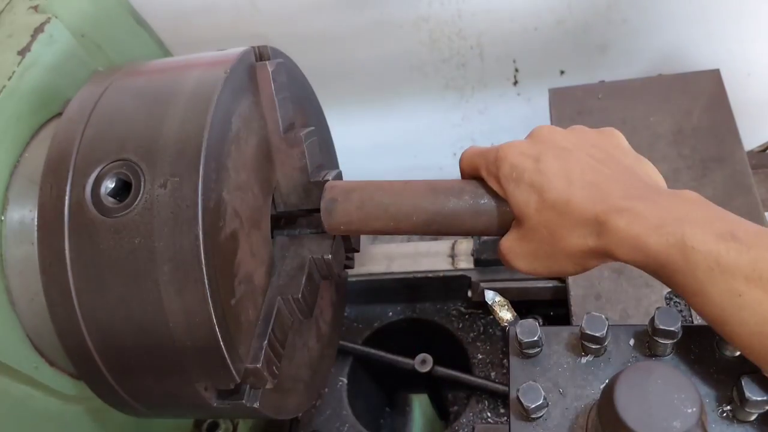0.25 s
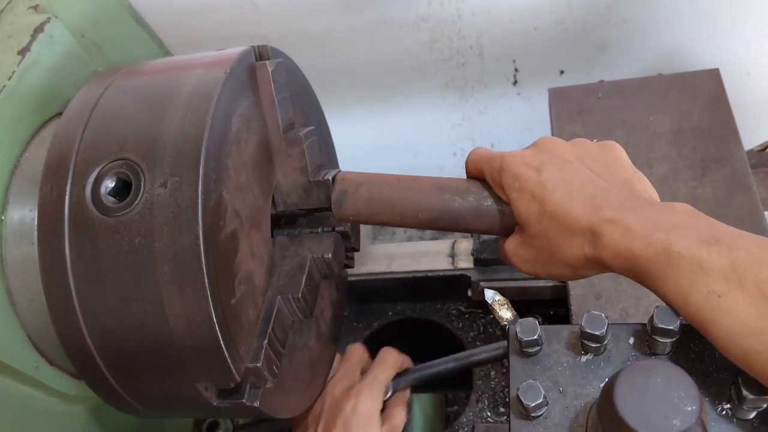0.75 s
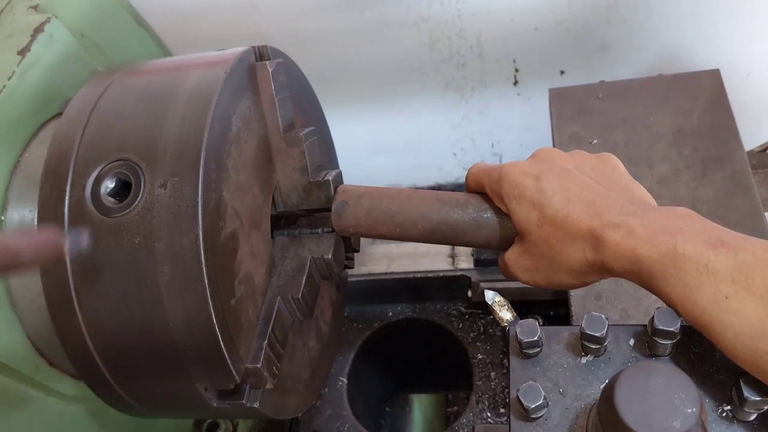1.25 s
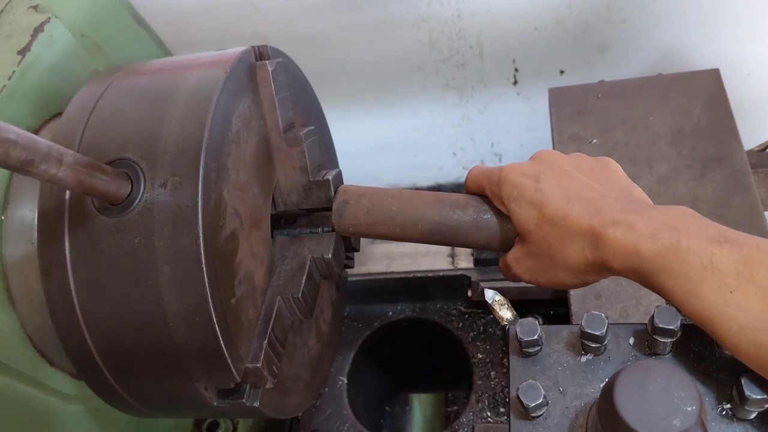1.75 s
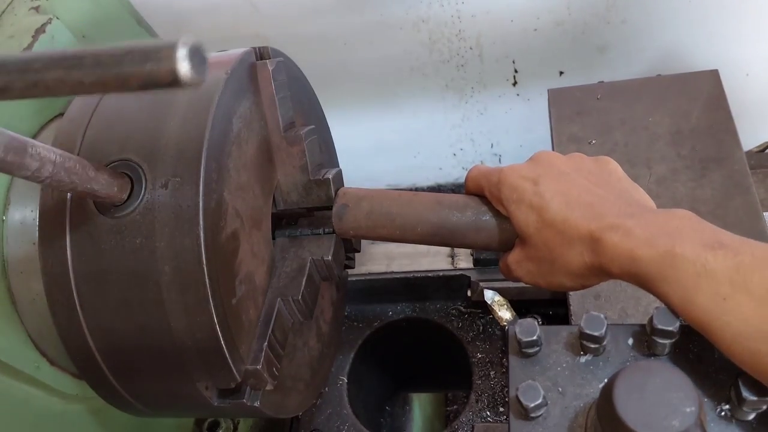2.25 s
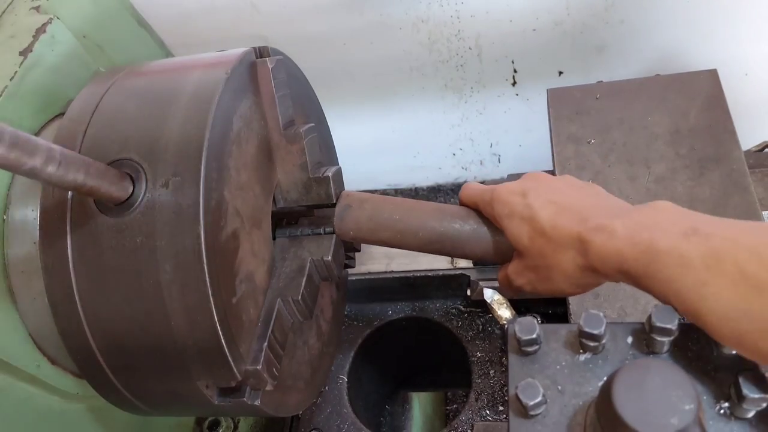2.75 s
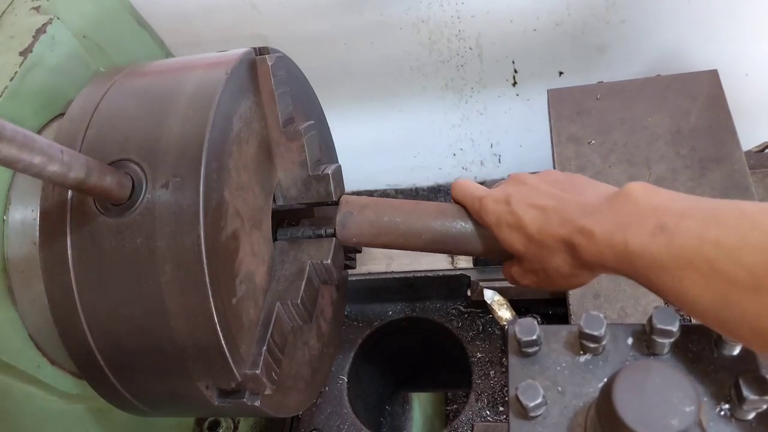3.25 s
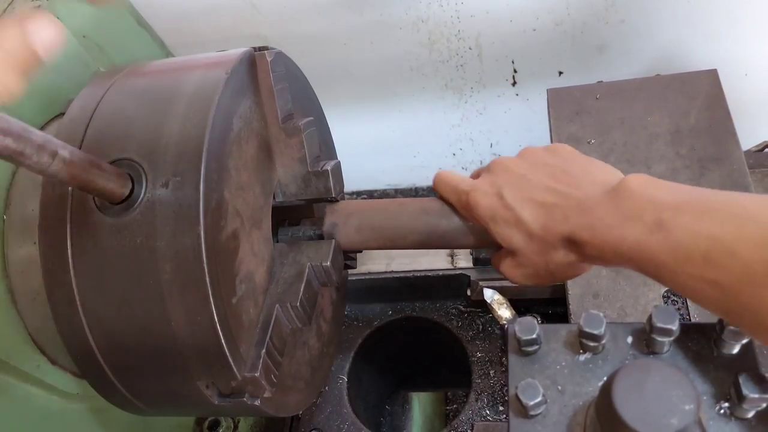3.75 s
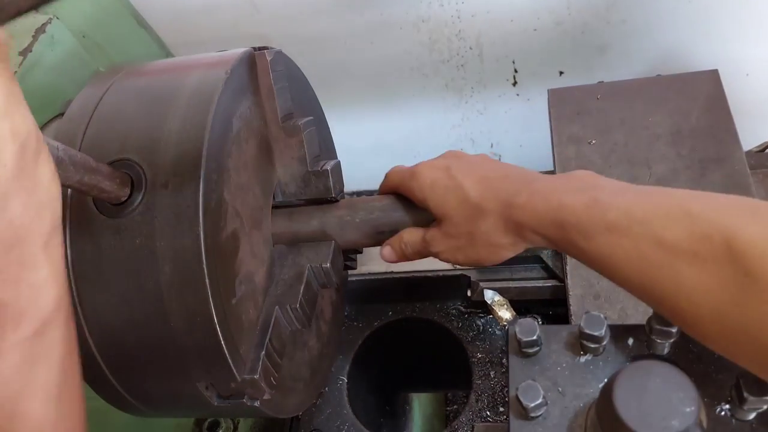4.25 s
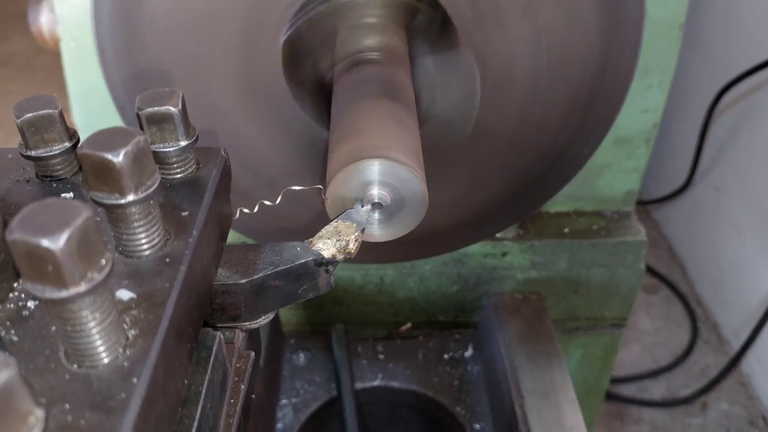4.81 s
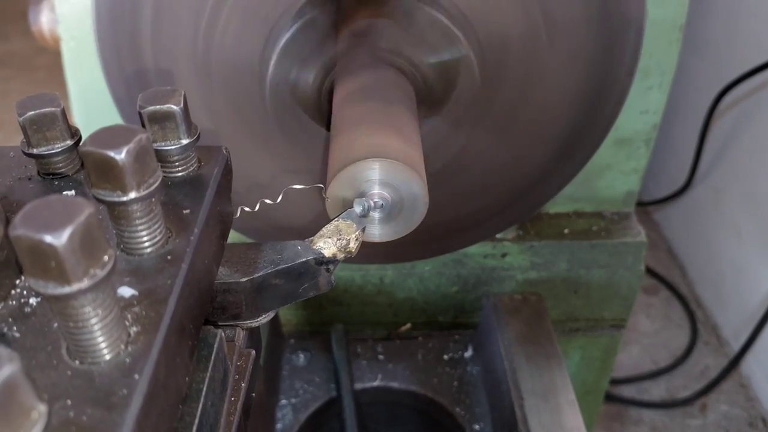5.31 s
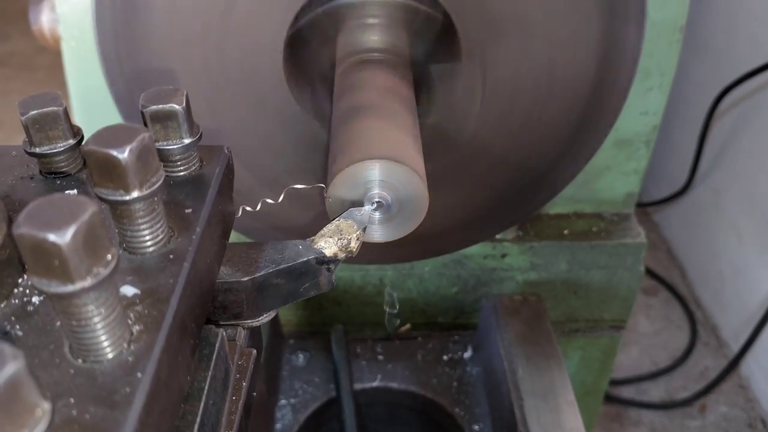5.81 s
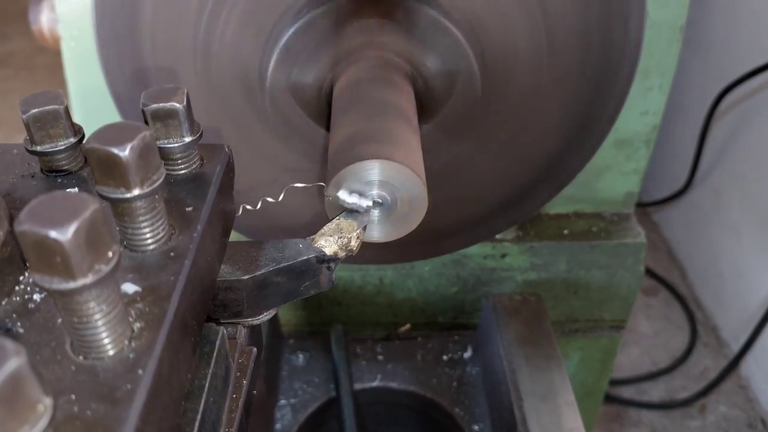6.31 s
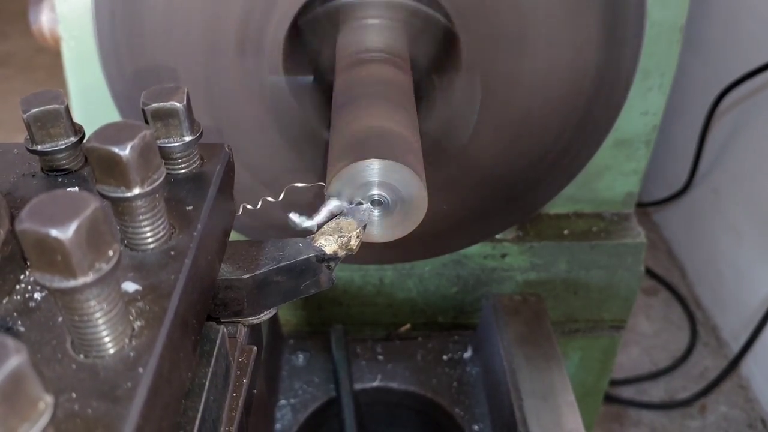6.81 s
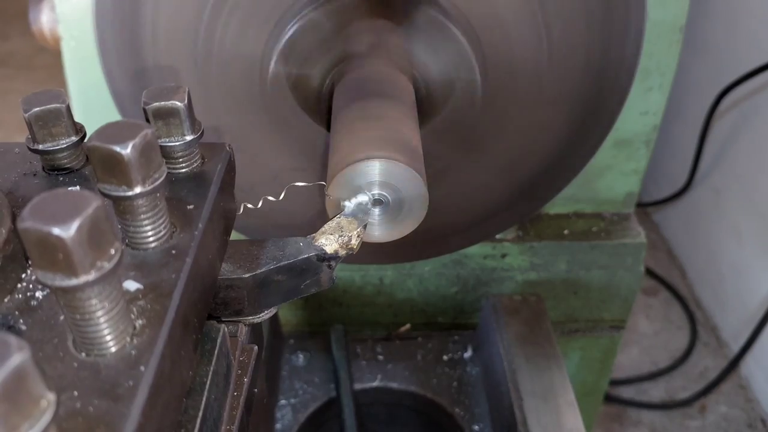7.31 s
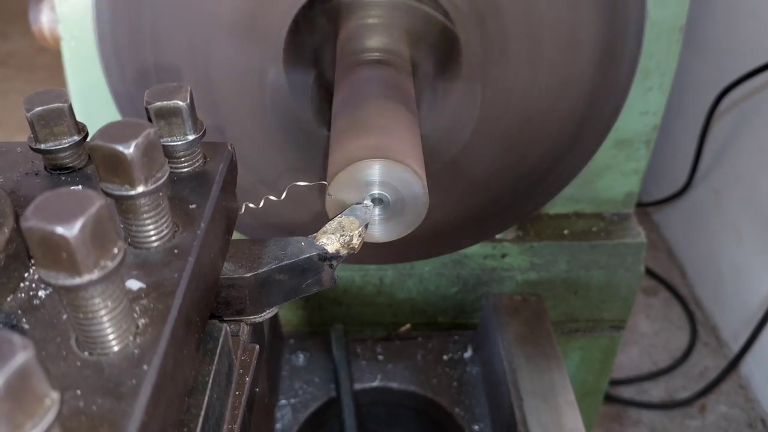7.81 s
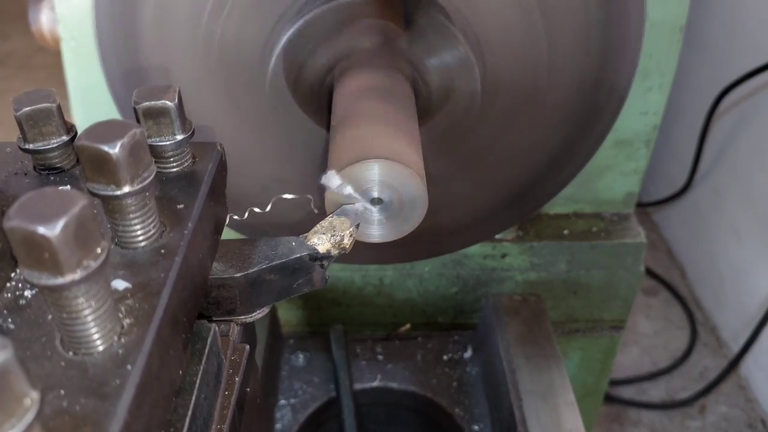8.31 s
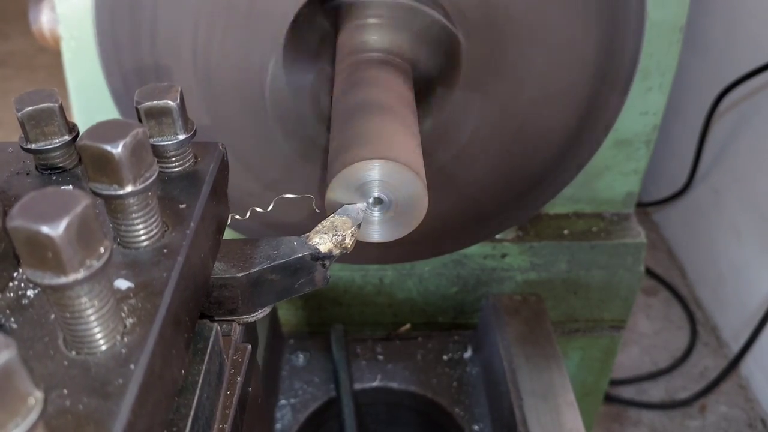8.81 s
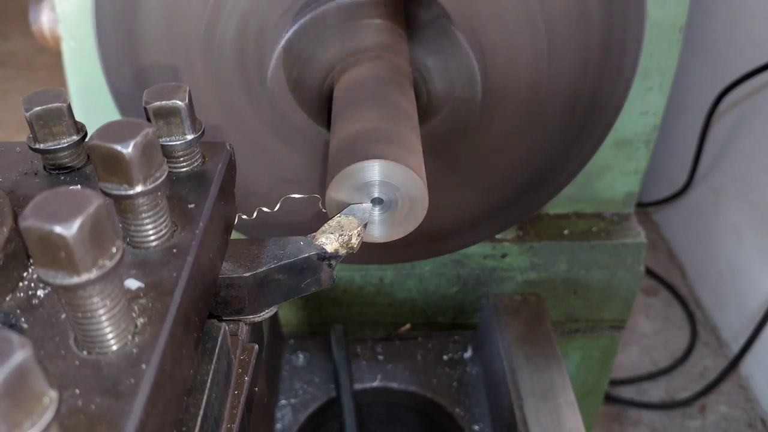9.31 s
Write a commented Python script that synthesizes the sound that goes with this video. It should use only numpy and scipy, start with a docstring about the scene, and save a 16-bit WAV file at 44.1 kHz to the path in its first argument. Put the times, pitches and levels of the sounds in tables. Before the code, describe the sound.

Close stereo pickup of machine work: dull and bright steel knocks, a brief key ring, a cluster of hard clacks, then uneven grinding jerks with faint squeaks and low bed thuds. A few soft bar taps end the clamping. After a short gap, continuous lathe noise fades in quickly, a fluttering whine over grainy roar, with bright tool hiss and tiny crisp chip ticks until the end.

```python
"""A steel bar is knocked into a lathe chuck, in a quiet workshop: noise bursts and decaying sines per blow.
The key is picked up, dropped into its socket and turned; random grains grind the jaws shut and the bed booms.
Then the lathe is heard running: sine mesh whine over grainy gearbox roar, cutting hiss, a few chips snapping.
Two microphone ports hear it in stereo; sources have levels and sides, with no distance modelled."""
import sys
import numpy as np
from scipy import signal
from scipy.fft import rfft, irfft, next_fast_len
from scipy.io import wavfile

SR = 44100
rng = np.random.default_rng(int(sys.argv[2]) if len(sys.argv) > 2 else 0)


def generate_wav(signal):
    """Clip the signal to [-1, 1] and save it as 16-bit WAV at the path in sys.argv[1]."""
    frames = np.transpose(np.atleast_2d(signal))
    scaled = np.clip(frames, -1, 1) * 32767
    pcm = np.round(scaled).astype(np.int16)
    wavfile.write(sys.argv[1], SR, pcm)


N = 421596
HALF = N // 2 + SR // 20  # samples; the clamping fills the early half, the running lathe the late one
SIZE = next_fast_len(N // 2 + SR // 10)
HZ = np.arange(SIZE // 2 + 1) * SR / SIZE + 1e-3
TIME = np.arange(N) / SR
CRACK, KNOCK, THUD, RING = 1, 2, 3, 4  # columns of the blow tables


def from_db(db):
    """dB to gain."""
    return 10 ** (np.asarray(db) / 20)


def rms_one(x):
    """Scale to rms 1."""
    return x / np.sqrt(np.mean(x ** 2) + 1e-20)


def in_time(rows):
    """Each column as a curve over the samples."""
    s, *columns = np.transpose(rows)
    return [np.interp(TIME, s, c) for c in columns]


def at_hz(points, hz, column=1):
    """Read a table on a log-frequency axis."""
    return np.interp(np.log(hz), np.log(np.array(points)[:, 0]), np.array(points)[:, column])


def drift(rate):
    """Slow random wandering of spread 1, about rate turns a second."""
    r = np.exp(-80 * np.pi * rate / SR)
    noise = rng.standard_normal(N // 40 + 2002)
    slow = signal.lfilter([1], [1, -2 * r, r * r], noise)[2000:]
    return np.interp(np.arange(N) / 40, np.arange(len(slow)), rms_one(slow))


def panned(db):
    """Left and right gains for a level difference."""
    return from_db(np.multiply.outer([.5, -.5], db))


def early(x):
    """Place a half-length sound at the start."""
    return np.pad(x, [(0, 0), (0, N - HALF)])


def late(x):
    """Place a half-length sound at the end."""
    return np.pad(x, [(0, 0), (N - HALF, 0)])


def grains(per_s, spread_db):
    """Random clicks of uneven size; dense ones merge into noise."""
    size_db = spread_db * np.minimum(rng.exponential(1, (2, SIZE)), 5)
    sizes = from_db(size_db) * rng.standard_normal((2, SIZE))
    return sizes * (rng.random((2, SIZE)) < per_s / SR)


def coloured(pair, spectrum, peaks, stereo, flicker_db):
    """Two streams become half-length stereo noise with colour, resonances and flicker; rms 1."""
    likeness, left_right, left_lead_s = stereo
    common, own = rfft(pair)
    alike = np.clip(at_hz(likeness, HZ), 0, 1)
    side_sign = np.array([[1], [-1]])
    turn = np.exp(1j * np.pi * HZ * left_lead_s * side_sign)
    sides = (np.sqrt(1 + alike) * common + np.sqrt(1 - alike) * own * side_sign) * turn
    bumps = sum(db / (1 + (2 * (HZ - hz) / width) ** 2) for hz, width, db in peaks)
    sides *= from_db(at_hz(spectrum, HZ) + bumps) * panned(at_hz(left_right, HZ))
    out, together = 0, drift(2.7)
    for centre in 40 * 4. ** np.arange(5):  # bands two octaves apart flicker separately
        octaves_off = abs(np.log(np.clip(HZ, 40, 10240) / centre) / np.log(4))
        share = np.clip(1 - octaves_off, 0, 1)
        flicker = from_db(flicker_db * (0.2 * together + drift(25))[:HALF])
        out = out + irfft(sides * share, SIZE)[:, :HALF] * flicker
    return rms_one(out)


def ring(clicks, modes, scatter_db):
    """Clicks set decaying sines going; every blow meets each mode with a new strength."""
    out, at = 0, np.flatnonzero(clicks[0])
    for hz, db, t60 in modes:
        r, w = from_db(-60 / (min(t60, .6) * SR)), 2 * np.pi * hz / SR
        push = clicks[:, :HALF] + 1e-18
        strength = from_db(db + scatter_db * rng.standard_normal(len(at)))
        push[:, at] *= strength * rng.choice([-1, 1], len(at))
        out = out + signal.lfilter([0, np.sin(w)], [1, -2 * r * np.cos(w), r * r], push)
    return out


def blows(rows, column, pan=True):
    """A stereo click train with the strengths of one column."""
    rows, out = np.array(rows), np.zeros((2, N))
    at = np.round(rows[:, 0] * SR).astype(int)
    out[:, at] = from_db(rows[:, column]) * panned(rows[:, -1] * pan)
    return out


def chatter(clicks, after_s, drop_db):
    """Loose steel bounces: each blow gets four contacts at uneven moments, 3 to 4 times drop_db weaker."""
    at, out = np.flatnonzero(clicks[0]), clicks.copy()
    chance = rng.random((len(at), 4, 2))
    for k in range(4):
        bounce = at + 40 + (chance[:, k, 0] * after_s * SR).astype(int)
        out[:, bounce] = clicks[:, at] * from_db(-drop_db * (3.0 + chance[:, k, 1]))
    return out


def fading(clicks, t60):
    """Envelope that jumps at each click and dies away."""
    return signal.lfilter([1], [1, -from_db(-60 / (t60 * SR))], abs(clicks[:, :HALF]) + 1e-18)


def fresh_noise(low_hz, high_hz, shared):
    """Stereo band noise, partly common to both sides; rms 1."""
    noise = rng.standard_normal((3, HALF))
    band = signal.butter(3, [low_hz, min(high_hz, 20000)], "band", fs=SR, output="sos")
    return rms_one(signal.sosfilt(band, noise[:2] + shared * noise[2]))


# quiet workshop colour, relative: pitch_hz, level_db
SHOP = [(15, -41), (25, -8), (97, 1.5), (223, -8), (293, 1.5), (354, -13.5), (1560, -17), (2910, -25),
        (3160, -28.5), (3620, -27), (16000, -37.5)]
SHOP_DB = -65
# shop and chuck work at the two microphone ports: (pitch_hz, likeness), (pitch_hz, left_right_db), left_lead_s
WORK_STEREO = ([(60, 0.99), (640, 1), (1410, 0.72), (3100, 0.32), (6820, 0.34), (15000, 0.05)], [(60, 1.0),
               (380, -1.0), (2380, 2.0), (8120, -1.0), (15000, 0.0)], .0003)


def quiet_shop():
    """Faint noise of the room behind the clamping."""
    noise = rng.standard_normal((2, SIZE))
    return early(from_db(SHOP_DB) * coloured(noise, SHOP, [], WORK_STEREO, flicker_db=1.5))


def contact_noise(bar, key):
    """Steel on steel: a bright crack of a few milliseconds and a longer dull knock, both fading noise."""
    sharp = blows(bar, CRACK) + chatter(blows(key, CRACK), .015, drop_db=15.0)
    cracks = 0.1 * fading(sharp, 0.0051) * fresh_noise(2200, 19000, shared=0.52)
    dull = fading(blows(bar + key, KNOCK), 0.034) * fresh_noise(610, 3200, shared=0.23)
    return cracks + 1.7 * dull


# steel and shop walls washing on after a knock: pitch_hz, after_loose_steel_db, after_seated_key_db, t60_s
WASH = [(171, -16.5, -12, 0.82), (375, 2.5, -4, 0.29), (740, 3, -6, 0.24), (1840, -0.5, 0, 0.23),
        (3330, -10, -7, 0.25), (6750, -33, -21.5, 0.21), (13200, -55, -10, .12)]


def wash(loose_hits, seated_hits):
    """Each knock leaves noise in bands that die at their own rates."""
    loose, seated = blows(loose_hits, KNOCK)[:, :HALF], blows(seated_hits, KNOCK)[:, :HALF]
    out = 0
    for hz, loose_db, seated_db, t60 in WASH:
        struck = from_db(loose_db) * loose + from_db(seated_db) * seated
        out = out + 0.4 * fading(struck, t60) * fresh_noise(hz / 1.6, hz * 1.37, shared=0.68)
    return out


# short knock of the jaw: pitch_hz, level_db, t60_s
JAW = [(1560, 3.5, 0.015), (1100, -10, 0.027), (2000, 20, 0.014), (723, -5.5, 0.057)]


def jaw_knock(bar):
    """The bar's rough skin blunts the contact, so the jaw's short modes are low-passed."""
    blunt = signal.butter(2, 2600, fs=SR, output="sos")
    return signal.sosfilt(blunt, ring(blows(bar, KNOCK), JAW, scatter_db=2.5))


# modes of the cast bed: pitch_hz, level_db, t60_s
BED = [(313.1, -3, 0.23), (323, 3, 0.1), (270, -6, 0.039), (188, -13.5, 0.069), (141, -14.5, 0.13),
       (438, -5.5, .06), (567, -4, 0.093)]


def bed_thud(hits):
    """Blows ring the bed's low modes; a band-pass softens them, as a soft contact has no click."""
    contacts = chatter(blows(hits, THUD, pan=False), 0.01397, drop_db=3.5)
    soft = signal.butter(2, [150, 620], "band", fs=SR, output="sos")
    return 0.88 * signal.sosfilt(soft, ring(contacts, BED, scatter_db=0.5))


# modes of the bar: pitch_hz, level_db, t60_s
BAR = [(3941, -3, .24), (3962, -10, .18), (9744, -19, .07), (12770, -32, .1), (3268, -27, .25),
       (4743, -30, .2)]
# modes of the key ringing freely off the tray: pitch_hz, level_db, t60_s
KEY_FREE = [(2056, 4, .38), (2085, -3, 0.2), (2433, 8, .08), (2300, -2, .06), (3198, 6, 0.036),
            (3644, -4, 0.03), (4134, 1, .05), (4420, -9, .06), (4861, -4, .05), (5631, -14, .05),
            (6912, -4, .07), (7150, -5, .06), (8888, -19, 0.06)]


def held_steel(bar, lift):
    """Hand-held bar and free key ring as decaying sines; a loose grip makes them flutter."""
    grip = from_db(3.5 * drift(45))[:HALF]
    bar_ring = ring(blows(bar, RING), BAR, scatter_db=1.2)
    key_ring = ring(chatter(blows(lift, RING), .012, drop_db=4), KEY_FREE, scatter_db=1.2)
    return 1.27 * grip * (bar_ring + key_ring)


# broad resonances of the key, damped by its socket: pitch_hz, level_db, t60_s
KEY_SEATED = [(2700, 1, 0.037), (3163, -15, 0.043), (3600, -0.5, .03), (4750, 0.5, 0.013), (6240, 0, .025),
              (6900, 0.5, .035), (8500, -9.5, 0.016), (11130, -1, 0.034), (13240, -2, 0.044)]


def seated_key(hits):
    """The socket damps the key: each short mode is part fading noise, part decaying sine."""
    rattle = chatter(blows(hits, RING), .012, drop_db=16.0)
    out = from_db(-3.5) * ring(rattle, KEY_SEATED, scatter_db=5.5)
    for hz, db, t60 in KEY_SEATED:
        noise = fresh_noise(hz / 1.2, hz * 1.125, shared=0.83)
        out = out + from_db(db) * fading(rattle, t60) * noise
    return out


# Blow strengths before each layer's own gain, in three tables with the same columns:
# start_s, crack_db, dull_knock_db, bed_thud_db, ring_db, left_right_db
# bar against the jaws
BAR_HITS = [(0.2474, -49, -35, -33, -32.5, 3.5), (0.4274, -80, -66, -45.5, -80, 0),
            (0.5529, -16, -42, -42, -46.5, -2.5), (0.5642, -55, -69, -45, -73, -1),
            (0.6959, -61, -42, -42, -53, 0), (0.7196, -70, -56, -41, -70, 3),
            (0.9739, -45, -56.5, -43.5, -47.5, 9), (3.9086, -68, -54, -54.5, -72, 7),
            (3.925, -62, -44, -49, -46, -3), (3.934, -70, -46, -63, -62, 5),
            (3.9885, -64, -77, -40.5, -66, 3), (4.0564, -66, -52.5, -41.5, -84, 5),
            (4.209, -80.5, -71, -46.5, -74, 1), (4.2323, -76, -52.5, -49, -77, -1),
            (4.2644, -74, -59.5, -46.5, -77, -2), (4.5351, -70, -56, -42, -90, 4)]
# key lifted off the tray, still ringing freely
KEY_LIFT = [(0.924, -32, -43, -68, -34, -0.5), (0.9692, -38, -45, -37, -55.5, -1.5)]
# key knocking in its socket
KEY_HITS = [(1.3884, -44, -39, -32.5, -68, 0), (1.4091, -18, -39.5, -60, -40.5, 0),
            (1.4703, -11, -32.5, -61, -26, -4), (1.5768, -4, -35.5, -38, -30.5, 0),
            (1.6047, -21, -43, -38.5, -40, 0.5), (2.05, -67, -69, -60.5, -84, -1),
            (2.0792, -65, -57, -56, -79, 0), (2.178, -56, -63, -48, -82, 1),
            (2.624, -61, -77.5, -50, -74, 7), (2.6617, -41, -58, -43, -58, 0),
            (2.7482, -68, -51.5, -51, -81, -3), (2.7893, -54, -62, -61, -70, -1),
            (2.854, -41, -55, -48, -53.5, -2), (3.0548, -63, -60.5, -57, -83, 0),
            (3.101, -40, -62, -44, -62, 0.5), (3.1217, -40, -61, -49, -60, 0),
            (3.2905, -40, -64, -43, -70, 1), (3.3184, -22, -47, -48, -45, -1),
            (3.3941, -34, -45.5, -45, -42.5, 0), (3.5381, -50, -56, -53, -66, -5),
            (3.5666, -32, -47, -66, -44.5, -2), (3.617, -50, -48.5, -52, -71, 0),
            (3.7405, -19, -52, -40, -58, -6), (3.8176, -55, -50, -47, -66, 1),
            (3.888, -61, -52, -41, -75, -4)]
LEFT_LEAD = 9  # samples


def knocks():
    """Each blow sums bright crack, dull knock washing on, bed thud and ringing steel."""
    key = KEY_LIFT + KEY_HITS
    out = contact_noise(BAR_HITS, key) + wash(BAR_HITS + KEY_LIFT, KEY_HITS)
    out = out + jaw_knock(BAR_HITS) + seated_key(KEY_HITS)
    out = out + bed_thud(BAR_HITS + key) + held_steel(BAR_HITS, KEY_LIFT)
    return early([out[0], np.roll(out[1], LEFT_LEAD)])


def dying_noise(table, rise_s):
    """Half a second of stereo noise whose bands die at their own rates."""
    t, tail = np.arange(SR // 2) / SR, 0
    for hz, db, t60 in table:
        band = signal.butter(2, [hz / 1.87, min(hz * 1.92, 20000)], "band", fs=SR, output="sos")
        noise = rng.standard_normal((3, len(t)))
        sides = signal.sosfilt(band, noise[:2] + 1.03 * noise[2])
        tail = tail + from_db(db - 60 * t / t60) * rms_one(sides)
    return tail * np.minimum(t / rise_s, 1)


# echo of the workshop, relative: pitch_hz, level_db, t60_s
ECHO = [(100, -12.5, 0.5), (282, -10.5, 0.38), (1000, -6.5, 0.34), (3010, -4.5, 0.41), (7000, -2, 0.32),
        (14000, -10, 0.16)]
ECHO_DB = -39.5  # gain on the convolved tail


def shop_echo(x):
    """Dense reflections off machine and walls: the blows convolved with dying noise."""
    tail = dying_noise(ECHO, rise_s=0.0086)
    return from_db(ECHO_DB) * signal.oaconvolve(x.mean(axis=0)[None], tail, axes=1)[:, :N]


# bar shoved along a jaw, key slid to the socket, then pulled round stroke by stroke:
# start_s, hold_s, bed_rumble_db, scroll_grind_db, dry_scrape_db
STROKES = [(0.71, 0.031, -49, -44, -81), (1.283, 0.033, -60, -60, -67.5), (1.39, 0.26, -54.5, -71, -73),
           (1.807, 0.038, -60.5, -65.5, -68.5), (1.97, 0.047, -59.5, -77.5, -75),
           (2.07, 0.14, -55, -56, -72), (2.282, 0.062, -45.5, -48.5, -59), (2.37, 0.029, -51, -57.5, -69.5),
           (2.64, 0.12, -48.5, -53, -75), (2.838, 0.019, -47, -47, -68), (2.974, .05, -55.5, -55, -86),
           (3.087, 0.032, -47, -51, -64), (3.314, 0.031, -41.5, -46, -57.5), (3.53, 0.11, -46, -48.5, -77),
           (3.716, .05, -43, -48, -63), (3.89, 0.035, -49.5, -51, -83), (4.055, .015, -61, -69, -71)]
# relative colour of bed rumble: pitch_hz, level_db
RUMBLE = [(15, -52.5), (25, -17), (75, -13.5), (128, 1), (244, -4.5), (301, 6), (372, -5.5), (452, -4),
          (900, -19), (1170, -40.5), (1980, -120)]
# relative colour of scroll grind: pitch_hz, level_db
GRIND = [(240, -29.5), (400, -4), (686, 0.5), (1070, 6), (2330, -8), (2690, -29), (3000, -32.5),
         (4000, -22), (5200, -32.5), (8800, -120)]
# relative colour of dry scrape: pitch_hz, level_db
SCRAPE = [(1470, -26.5), (2500, -1.5), (5270, -3), (6300, -5.5), (8020, -16.5), (9890, -20.5), (10900, -9),
          (12400, -9.5), (14900, -18.5), (16000, -23)]
# rubbed modes of the scroll: pitch_hz, width_hz, boost_db
SCROLL = [(2745, 60, 3)]
# squeaking modes: pitch_hz, width_hz, level_db
SQUEAK = [(4680, 51, -1), (2720, 37, -2)]
RISE_DB_PER_S, FALL_DB_PER_S = 213, 124  # each stroke swells and slackens, times the layer's swing
RUMBLE_SWING, GRIND_SWING, SCRAPE_SWING = 0.97, 1.3, 1.5  # brighter layers follow the stroke more steeply
SQUEAK_UNDER_DB, SQUEAK_FROM_S, SQUEAK_TO_S = 23, 2.06, 3.9  # below the grind, while the scroll carries load


def clamping():
    """Stick-slip of scroll and jaws: uneven grains into bed, scroll and the rubbing faces."""
    s, hold, rumble_db, grind_db, scrape_db = np.transpose(STROKES)[:, :, None]
    t = TIME[:HALF:32]
    slack_db = RISE_DB_PER_S * np.maximum(s - t, 0) + FALL_DB_PER_S * np.maximum(t - s - hold, 0)

    def level(db, swing):
        """Sum the power of all strokes into one gain curve."""
        power = np.sum(from_db(db - swing * slack_db) ** 2, axis=0)
        return np.interp(TIME, t, np.sqrt(power))

    rumble = early(coloured(grains(900, 1.7), RUMBLE, [(333, 7.6, 2.9)], WORK_STEREO, flicker_db=-2.5))
    grind = early(coloured(grains(1200, 3.2), GRIND, SCROLL, WORK_STEREO, flicker_db=1.8))
    scrape = early(coloured(grains(5000, 3.6), SCRAPE, SCROLL, WORK_STEREO, flicker_db=3.5))
    squeak = 0
    for hz, width, db in SQUEAK:
        tone = signal.lfilter(*signal.iirpeak(hz, hz / width, fs=SR), scrape)
        squeak = squeak + from_db(db) * rms_one(tone)
    loaded = (TIME > SQUEAK_FROM_S) & (TIME < SQUEAK_TO_S)
    # grinding drags a little scrape along
    grinding = level(grind_db, GRIND_SWING) * (grind + from_db(-26.5) * scrape)
    squeaking = loaded * from_db(3.5 * drift(20)) * level(grind_db - SQUEAK_UNDER_DB, 1) * squeak
    scraping = level(scrape_db, SCRAPE_SWING) * scrape
    return level(rumble_db, RUMBLE_SWING) * rumble + grinding + scraping + squeaking


# single short notes of the key: start_s, pitch_hz, strike_db
PINGS = [(1.4088, 3150, -29), (1.4712, 3300, -22), (1.5772, 6000, -27), (2.243, 3660, -57),
         (2.747, 4000, -53)]
PING_T60_S = .03


def key_pings():
    """Each ping is one decaying sine."""
    out = 0
    for s, hz, db in PINGS:
        out = out + ring(blows([(s, db, 0)], 1), [(hz, 0, PING_T60_S)], scatter_db=-2)
    return early(out)


# fingers sliding along the bar: middle_s, half_length_s, level_db
RUBS = [(3.97, .03, -67), (4.3, 0.043, -71.5)]


def singing_bar():
    """Sliding fingers make the bar sing: rubbing noise through two of its modes, swelling and fading."""
    t, rub = TIME[:HALF], rng.standard_normal(HALF)
    touch = sum(from_db(db) * np.exp(-((t - s) / half) ** 2) for s, half, db in RUBS)
    sung = 0
    for hz, db in [(BAR[0][0], 0), (BAR[2][0], -5)]:
        tone = signal.lfilter(*signal.iirpeak(hz, hz / 40, fs=SR), rub)
        sung = sung + from_db(db) * rms_one(tone)
    return early(np.tile(touch * sung, (2, 1)))


# gear mesh: order, level_db, left_right_db, right_lead_rad, wobble_depth, flutter_db, phase_jitter_rad
MESH = [(1, -23.5, 28.5, 0.059, 0.091, 0.5, 0.48), (2, 1.5, -4, 0.56, 0.016, -0.65, 0.49),
        (3, -6, -2.5, 0.72, 0.13, -0.5, 0.96), (5, -9.5, 8.5, 1, 0.4, 0, 0.47),
        (6, -23.5, -7, 0.93, 0.18, 2, 1.75)]
SHAFT_HZ, SECOND_HZ = 18, 784.6  # shaft turns; second mesh order


def whine(second_hz):
    """Tooth mesh orders; an off-centre shaft wobbles them once a turn, worn teeth blur them."""
    mesh = np.pi * np.cumsum(second_hz * (1 + 0.0012 * drift(7.7)[:HALF])) / SR
    shaft = 2 * np.pi * SHAFT_HZ * TIME[:HALF]
    out = 0
    for order, db, pan_db, lead, wobble, flutter_db, jitter in MESH:
        turn = shaft + rng.uniform(0, 2 * np.pi)
        level = from_db(db + flutter_db * drift(5.6)[:HALF]) * (1 + wobble * np.sin(turn))
        phase = order * mesh + rng.uniform(0, 2 * np.pi) + jitter * drift(8.4)[:HALF]
        # load and speed swing together, which favours the lower sideband
        phase = phase + 2.0 * wobble * np.cos(turn)
        out = out + level * panned(pan_db)[:, None] * np.sin(phase + [[0], [lead]])
    return late(np.sqrt(2) * out)


# running lathe at the two microphone ports: (pitch_hz, likeness), (pitch_hz, left_right_db), left_lead_s
RUN_STEREO = ([(60, 1.1), (290, 0.96), (640, 0.63), (1410, 0.09), (3100, 0.53), (6820, 0.05), (15000, 0)],
              [(60, -4.5), (110, 3.5), (380, 0), (700, 3), (1290, -1), (2380, 0.5), (4400, -2),
              (8120, -0.5), (15000, -2.5)], -0.000073)
# relative colour of gearbox roar: pitch_hz, level_db
ROAR = [(15, -72), (25, -31.5), (154, -21), (280, -12), (650, -10.5), (777, -5), (868, -12), (1080, -16),
        (1160, -12.5), (1650, -19), (1970, -16), (2110, -17.5), (2350, -17), (3000, -29), (5000, -39),
        (6500, -43), (11000, -120)]
# casing resonances: pitch_hz, width_hz, boost_db
CASING = [(270, 98, 8.5), (795, 260, -2.5), (1392, 245, 7.5), (2150, 100, -1.5), (3730, 150, 3)]


def gearbox_roar():
    """Dense uneven grains ring the casing; rms 1."""
    return late(coloured(grains(20000, 2.46), ROAR, CASING, RUN_STEREO, flicker_db=0.94))


# the cut over time: start_s, hiss_db, sizzle_db
CUT = [(4.9, -49.5, -56), (5.1, -46, -50), (5.7, -47.5, -56), (5.91, -50.5, -56), (6.1, -46, -49),
       (6.35, -46.5, -44), (6.85, -48.5, -54), (7.65, -47.5, -53.5), (7.81, -57, -60), (7.94, -46, -52.5),
       (8.4, -48, -55), (8.5, -56, -58), (8.92, -46, -54), (9.04, -51.5, -55), (9.3, -58, -59),
       (9.56, -56, -59)]
# relative colour of cutting hiss: pitch_hz, level_db
HISS = [(2060, -20), (3500, -13.5), (3980, -1), (5490, -8.5), (7120, -4), (8620, -10), (9340, -11),
        (10400, -7.5), (11500, -2), (13400, -6), (14800, -6), (15300, -10)]
# tool and chip resonances: pitch_hz, width_hz, boost_db
TOOL = [(5930, 240, 7), (7030, 120, 5.5), (8100, 79, 2.9), (8400, 100, 5.5), (9070, 120, 7),
        (9540, 120, 8.5), (11760, 430, 2), (14600, 530, 8)]


def cutting_hiss():
    """Dense grains through the tool's resonances; the finer sizzle above 12.3 kHz has its own level."""
    hiss_db, sizzle_db = in_time(CUT)
    cut = late(coloured(grains(25000, 1.2), HISS, TOOL, RUN_STEREO, flicker_db=1.4))
    sizzle = signal.sosfiltfilt(signal.butter(3, 12300, "high", fs=SR, output="sos"), cut)
    return from_db(hiss_db) * (cut - sizzle) + from_db(sizzle_db) * sizzle


# chips snapping: start_s, strike_db, left_right_db
CHIPS = [(5.083, -30, 5), (5.7275, -29, -4), (6.2319, -31, -2.0), (6.3132, -36, -0.5), (6.3417, -35, 0.0),
         (6.5632, -35, -1.0), (8.4429, -28.5, -5), (9.008, -26.5, -4), (9.0575, -32, -5)]


def snapping_chips():
    """Each chip is a short decaying burst of bright noise."""
    t = np.arange(SR // 20) / SR
    burst = rng.standard_normal((2, len(t))) * from_db(-60 * t / 0.021)
    kernel = 0.23 * burst[:1] + .5 * burst  # partly common to both sides
    snaps = signal.oaconvolve(blows(CHIPS, 1), kernel, axes=1)[:, :N]
    return 0.67 * signal.sosfilt(signal.butter(2, 5500, "high", fs=SR, output="sos"), snaps)


START_S, FADE_IN_S = 4.767, 0.14
WHINE_DB, ROAR_DB = -30.5, -29.5  # at START_S
WHINE_SAG_DB_PER_S, ROAR_SAG_DB_PER_S = 0.16, 0.2


def lathe():
    """Whine, roar and cutting hiss fade in at full speed; chips snap on top."""
    since = TIME - START_S
    gears = from_db(WHINE_DB - WHINE_SAG_DB_PER_S * since) * whine(SECOND_HZ)
    roar = from_db(ROAR_DB - ROAR_SAG_DB_PER_S * since) * gearbox_roar()
    fade = np.clip(since / FADE_IN_S, 0, 1) ** 1.37
    return fade * (gears + roar + cutting_hiss()) + snapping_chips()


DIP_S, DIP_HALF_S, DIP_DB = 2.535, .045, -10  # the level dips briefly


def scene():
    """Clamping, then turning, in a quiet workshop."""
    shop = quiet_shop()
    hits = knocks()
    work = hits + shop_echo(hits) + clamping() + key_pings() + singing_bar()
    dip = from_db(DIP_DB * np.exp(-((TIME - DIP_S) / DIP_HALF_S) ** 4))
    return dip * (shop + work) + lathe()


CUTOFF_HZ = 15850


def record(dry):
    """The top is cut, with a steep shoulder under it."""
    shoulder = signal.sosfilt(signal.ellip(8, .5, 25, 15450, fs=SR, output="sos"), dry)
    return signal.sosfilt(signal.ellip(12, .3, 70, CUTOFF_HZ, fs=SR, output="sos"), shoulder)


dry = scene()
out = record(dry)
generate_wav(out)
```